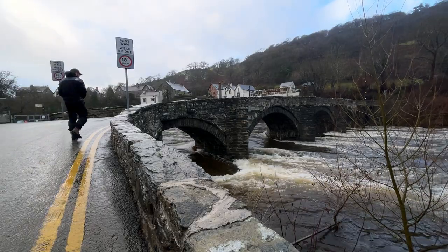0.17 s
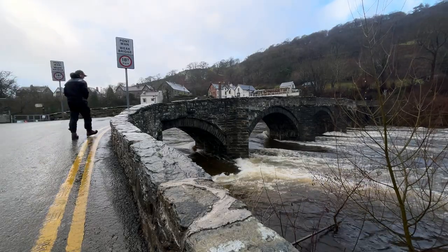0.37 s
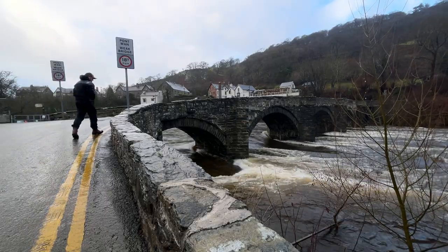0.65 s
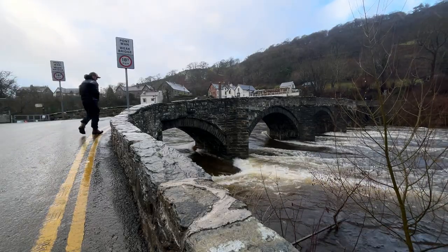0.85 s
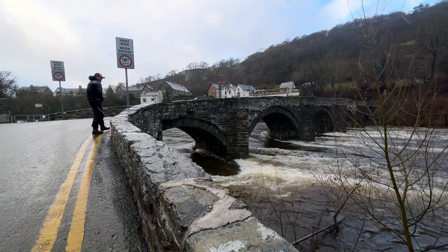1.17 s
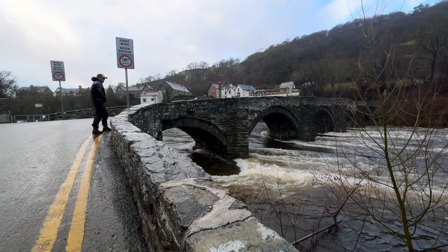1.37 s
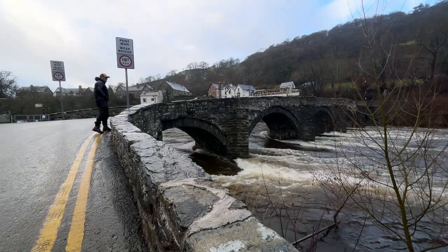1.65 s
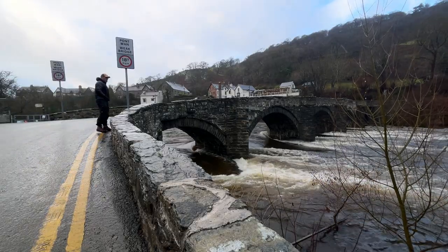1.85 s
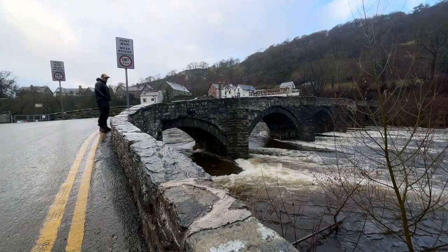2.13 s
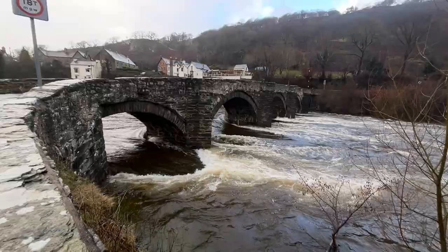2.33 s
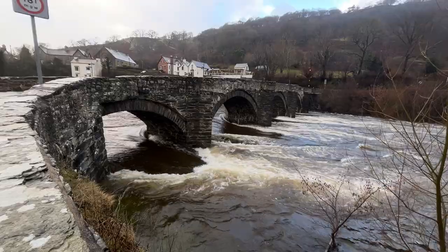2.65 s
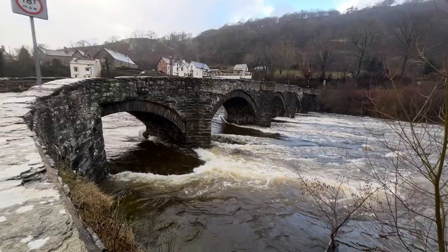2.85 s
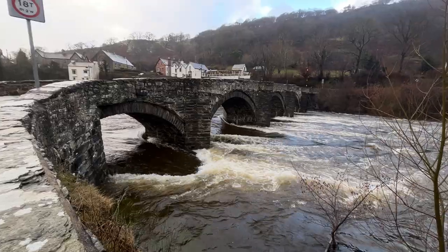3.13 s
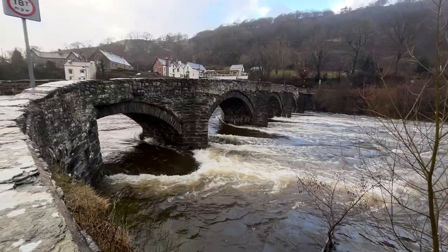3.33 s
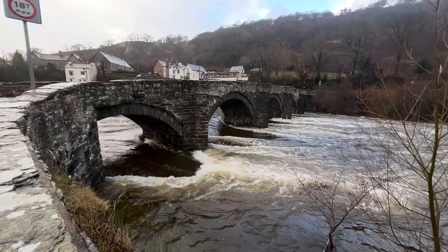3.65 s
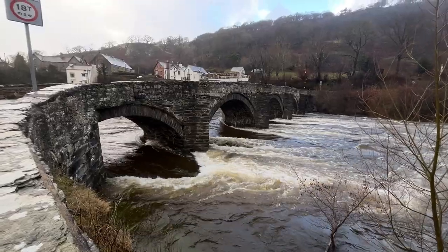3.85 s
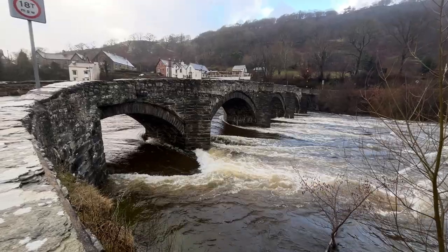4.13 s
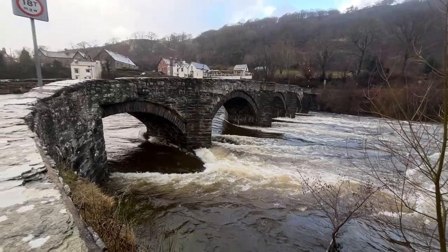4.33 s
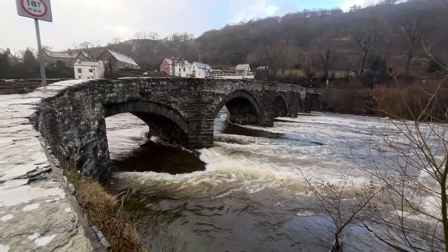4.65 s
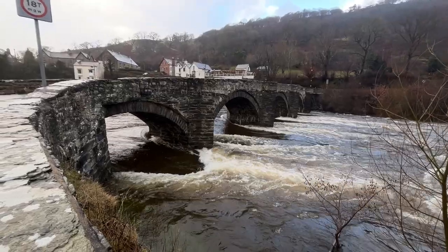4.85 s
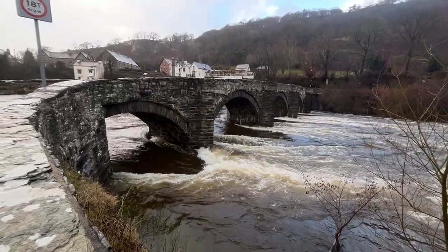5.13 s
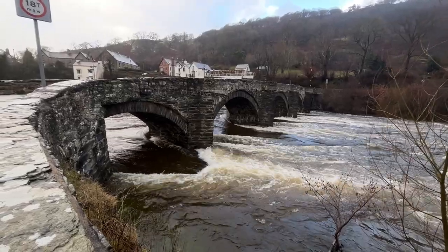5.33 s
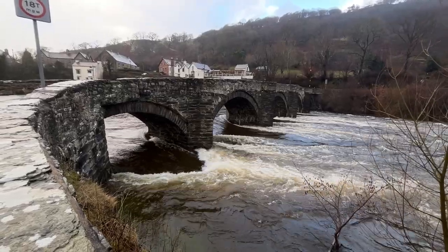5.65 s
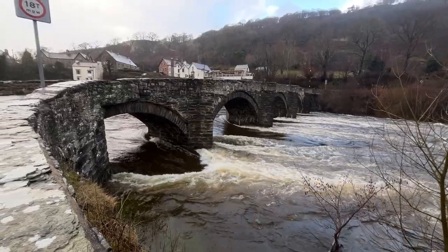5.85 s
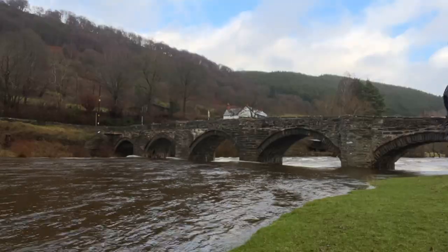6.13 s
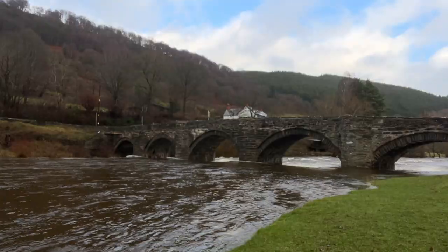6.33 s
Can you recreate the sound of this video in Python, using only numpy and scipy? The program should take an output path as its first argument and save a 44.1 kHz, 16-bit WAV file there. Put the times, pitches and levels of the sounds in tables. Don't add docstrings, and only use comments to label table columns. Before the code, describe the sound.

Constant white-water rush heard close outdoors from three spots by a bridge. First a full roar with hiss and only light low wind bumps; then the parapet view, a little softer, with deep fluttering gusts pounding the bare microphone and several harsh overloads that blank the water for an instant. Finally a sudden clean cut to the grassy bank, where the water is stronger and less bright. No footsteps or voices.

```python
import sys
import numpy as np
from scipy import signal
from scipy.fft import rfft, irfft, next_fast_len
from scipy.io import wavfile
from scipy.ndimage import uniform_filter1d, map_coordinates

SR = 44100
rng = np.random.default_rng(int(sys.argv[2]) if len(sys.argv) > 2 else 0)


def wav_record(signal):
    frames = np.transpose(np.atleast_2d(signal))
    bounded = np.clip(frames, -1, 1)
    quanta = np.round(bounded * 32767).astype(np.int16)
    wavfile.write(sys.argv[1], SR, quanta)


def rack_gain(trim_db):
    fader = np.asarray(trim_db, float)
    return 10 ** (fader / 20)


N = 286209

SPOT_CHANGES = [
    2.32,
    5.965,
]
# f/Hz, density/dB
ROAD_COLOUR = [(26, -55), (45, -17), (100, -9.5), (140, -6), (240, -1), (620, -3), (1470, -7.5),
               (2400, -12), (6300, -24), (16000, -36)]
# f/Hz, density/dB
PARAPET_COLOUR = [(40, -46), (70, -14), (113, -11), (190, -6), (500, -7), (1200, -9), (2400, -12.5),
                  (6400, -23), (16000, -34.5)]
# f/Hz, density/dB
BANK_COLOUR = [(18, -58), (45, -21), (160, -5.5), (470, -5.5), (990, -9), (1460, -15), (2470, -14.5),
               (5600, -26), (16000, -45.5)]
# t/s, level over usual/dB
SURGE_CURVE = [(0, 0.5), (.2, 0), (.39, 1), (.58, -3), (.96, 1), (1.15, 2.5), (1.54, -3), (1.92, 1),
               (2.31, 4), (2.33, 0), (2.9, -0.5), (3.5, -1.5), (4.35, 0.54), (4.95, -0.06), (5.5, 0),
               (5.955, -0.5), (5.975, 1.5), (6.49, 0)]
ROAR_LEVELS = [-32.5, -34.5, -29]
SPRAY_LEVELS = [-36.5, -39.5, -36]
# f/Hz, gain/dB
PORT_RESPONSE = [(0, -1.5), (6400, 0), (8300, 4), (8900, 1), (10100, -6), (11500, -1.5), (13200, 0),
                 (14300, -4.5), (16100, -6)]
# f/Hz, density/dB
HEAVE_COLOUR = [(.5, -30), (1.5, -5.5), (3, 0.5), (6, -3), (11, -7.5), (14, -12.5), (20, -70)]
# f/Hz, density/dB
RUMBLE_COLOUR = [(10, -19), (15, 4), (25, 5), (38, -14.5), (55, -36)]
# f/Hz, density/dB
FLUTTER_COLOUR = [(30, -36), (42, 0.5), (60, -4), (85, -16.5), (120, -17), (200, -55)]
# t/s, strength/dB, turbulence/dB
WIND_CURVE = [(0, -20, 0), (.1, -14.5, 2), (.22, -29, -4), (.48, -12, -3), (.8, -25, -11),
              (1.3, -15.5, 2.5), (1.55, -12, -4), (1.85, -30.5, -1), (2.3, -23.5, -0.5), (2.66, -27, 2.5),
              (2.9, -20.5, 7), (3.55, -14.5, 13), (3.8, -14, 9.5), (4.2, -18, 6), (4.7, -19, 6.5),
              (5.45, -13.5, 7), (5.955, -11.5, 2.5), (5.975, -39, 8)]
# t/s, length/s, lift/dB, sharpness/dB
EDDY_STRIKES = [(.36, 0.089, 20, -3), (.48, 0.076, 9, 0), (0.664, 0.1, 14.5, 6), (1.2, .1, 2, 2),
                (1.498, .1, 2, -4), (2.304, .08, 14.5, 2), (2.81, 0.068, 18, -12), (2.954, 0.065, 6, 4),
                (3.05, .06, 1, 16), (3.152, 0.06, 15.5, -11), (3.302, 0.12, 12.5, -3.5),
                (3.483, 0.084, 10.5, -2), (3.628, 0.054, 2.5, 3), (3.78, .08, 1, -5), (3.974, .08, 1, 1),
                (4.104, 0.064, 8, -3), (4.31, 0.11, 14.5, -11), (4.428, 0.12, 16, -8),
                (4.695, .06, 11, -12), (4.865, .1, 14.5, -7), (5.042, 0.089, 3, 19),
                (5.205, 0.13, 10.5, -3.5), (5.293, .06, 3.5, 2), (5.45, 0.11, 13, -1), (5.6, .08, 3, 6),
                (5.77, 0.11, 8, -8), (5.897, .08, 8, 2)]
# t/s, length/s, signed rail level/full scale, approach/(1/s), release/(1/s)
OVERLOADS = [
    (2.9247, .0422, .522, 34, 34),
    (3.0692, .0529, .357, 34, 28),
    (3.2655, .0150, .340, 40, 22),
    (4.4465, .0140, -.400, 18, 6),
    (4.9525, -.002, .325, 6, 6),
    (5.0461, .0154, -.579, 24, 36),
    (5.4205, .0171, .458, 22, 70),
    (5.4498, .0630, -.790, 70, 36),
    (5.6000, .0200, .597, 26, 6),
    (5.7953, .0256, .600, 40, 34),
]

SAG_S, TOP = .084, .483
RUMBLE_DB, FLUTTER_DB = -23, -34
FLUTTER_GROWS = 1.05
RISE_SHARE = .4
HEAVE_SHARE = 0.19


def unit(x):
    return x / np.sqrt(np.mean(x ** 2) + 1e-20)


def curves(rows):
    s, *cols = np.transpose(rows)
    return [np.interp(np.arange(N) / SR, s, c) for c in cols]


def wobble(rate):
    knots = rng.standard_normal(int(N * rate / SR) + 4)
    return map_coordinates(knots, [np.arange(N) * rate / SR])


def along(points, hz):
    f, db = np.transpose(points)
    return rack_gain(np.interp(np.log(hz + 0.14), np.log(f + 0.043), db, left=-120, right=-120))


def coloured(x, spectrum, share=lambda hz: 1):
    m = next_fast_len(N + SR)
    hz = np.fft.rfftfreq(m, 1 / SR)
    gain = along(spectrum, hz) * along(PORT_RESPONSE, hz) * share(hz)
    return unit(irfft(rfft(x, m) * gain, m)[:N])


def churn(patchy_db):
    z = signal.stft(rng.standard_normal(N + 512), nperseg=512)[2]
    field = uniform_filter1d(rng.standard_normal(z.shape), 6, 0)
    field = uniform_filter1d(field, 12, 1)
    return signal.istft(z * rack_gain(patchy_db * unit(field)), nperseg=512)[1][:N]


def bubbles(count, centre_hz, spread, cycles, scatter_db):
    when, size = rng.random((count, 2)).T
    hz = np.clip(centre_hz * np.exp(spread * rng.standard_normal(count)), 150, 7000)[:, None]
    step = np.arange(1200)
    turn = hz * step / SR
    ring = np.sin(2 * np.pi * turn * (1 + 0.094 * turn / cycles))
    ring *= np.exp(-2.5 * turn / cycles) * (1 - np.exp(-turn))
    loudness = rack_gain(-scatter_db * np.log(size + 1e-2))[:, None]
    ring *= loudness * np.sqrt(hz)
    at = (when * N).astype(int)[:, None] + step
    return unit(np.bincount(at.ravel(), ring.ravel())[:N])


def low_share(hz):
    return 1 / np.sqrt(1 + (hz / 1700) ** 4)


def high_share(hz):
    return np.sqrt(1 - low_share(hz) ** 2)


def from_each_spot(water, share, spot):
    colours = (ROAD_COLOUR, PARAPET_COLOUR, BANK_COLOUR)
    return np.choose(spot, [coloured(water, colour, share) for colour in colours])


def roar(spot):
    gurgles = bubbles(count=3000, centre_hz=693.4, spread=0.548, cycles=5.2, scatter_db=1.4)
    tumbling = unit(churn(patchy_db=0.28)) + rack_gain(-17.5) * gurgles
    return from_each_spot(tumbling, low_share, spot)


def spray(spot):
    fizz = bubbles(count=3500, centre_hz=3410, spread=0.516, cycles=1.9, scatter_db=-0.5)
    fizzing = unit(churn(patchy_db=-0.13)) + rack_gain(-14) * fizz
    return from_each_spot(fizzing, high_share, spot)


def river():
    swell_db, = curves(SURGE_CURVE)
    spot = np.searchsorted(SPOT_CHANGES, np.arange(N) / SR)
    surge_db = 0.53 * wobble(3.305) + 0.24 * wobble(9)
    roar_db = np.take(ROAR_LEVELS, spot) + 0.9 * swell_db + surge_db + 0.28 * wobble(11)
    spray_db = np.take(SPRAY_LEVELS, spot) + swell_db + surge_db
    return rack_gain(roar_db) * roar(spot) + rack_gain(spray_db) * spray(spot)


def gusts():
    strength_db, turbulence_db = curves(WIND_CURVE)
    s, length, lift_db, sharp_db = np.transpose(EDDY_STRIKES)[..., None]
    t = np.arange(0, N / SR, .002)
    late = (t - s) / length
    phase = np.where(late < 0, late / RISE_SHARE, late / (1 - RISE_SHARE))
    bump = np.cos(np.pi / 2 * np.clip(phase / 2, -1, 1)) ** 2
    lift, edge = (lift_db * bump).sum(axis=0), (sharp_db * bump).sum(axis=0)
    struck_db, edge_db = curves(np.transpose([t, lift, edge]))
    heave_db = strength_db + HEAVE_SHARE * struck_db
    rumble_db = strength_db + RUMBLE_DB + turbulence_db + struck_db
    flutter_db = strength_db + FLUTTER_DB + FLUTTER_GROWS * turbulence_db + struck_db + edge_db
    return heave_db, rumble_db, flutter_db


def steady(x, evenness):
    envelope = np.abs(signal.hilbert(x, next_fast_len(N))[:N])
    return unit(x / (uniform_filter1d(envelope, 600) + 0.17) ** np.clip(evenness, 0, 1))


def rail(since, level):
    return np.minimum(abs(level) * np.exp(-np.clip(since, -SAG_S, 1) / SAG_S), TOP)


def wind():
    heave_db, rumble_db, flutter_db = gusts()
    heave = steady(coloured(rng.standard_normal(N), HEAVE_COLOUR), evenness=0.75)
    rumble = steady(coloured(rng.standard_normal(N), RUMBLE_COLOUR), evenness=0.98)
    flutter = steady(coloured(rng.standard_normal(N), FLUTTER_COLOUR), evenness=0.38)
    push = rack_gain(heave_db - 0.5) * heave + rack_gain(rumble_db + 1.5) * rumble + rack_gain(flutter_db + 0.2) * flutter
    push /= (1 + np.abs(push / .43) ** 4) ** .25
    t = np.arange(N) / SR
    for s, length, level, approach, release in OVERLOADS:
        beyond = np.minimum(approach * (t - s) + .032, release * (s + length - t) + .025)
        outside = np.maximum(np.maximum(s - t, t - s - length), 0)
        grip = np.cos(np.pi / 2 * np.clip(outside / 0.028, 0, 1)) ** 2
        push += grip * (np.sign(level) * (rail(t - s, level) + beyond) - push)
    return push


def scene():
    return (river() + wind())[None]


def roll_off(x):
    return signal.sosfilt(signal.butter(12, 15760, fs=SR, output="sos"), x)


def record(dry):
    t = np.arange(N) / SR
    high, low = np.full(N, TOP), np.full(N, -TOP)
    for s, length, level, _, _ in OVERLOADS:
        near = (t > s - .004) & (t < s + length + .008)
        held = rail(t - s, level)[near]
        if level > 0:
            high[near] = held
        else:
            low[near] = -held
    mix = np.clip(dry, low, high)
    return roll_off(mix)


dry = scene()
out = record(dry)
wav_record(out)
```